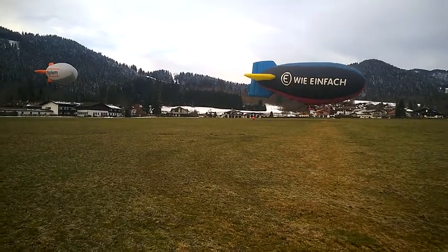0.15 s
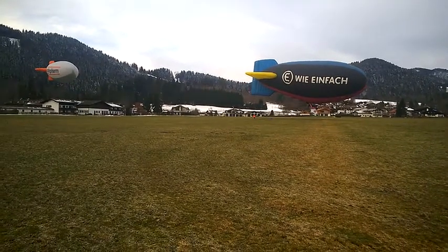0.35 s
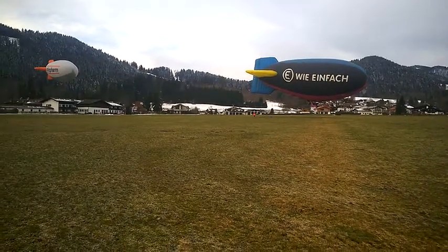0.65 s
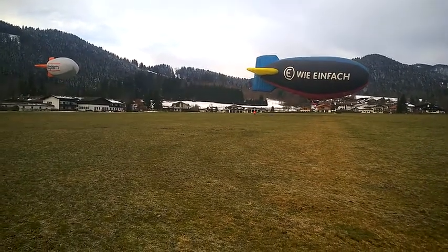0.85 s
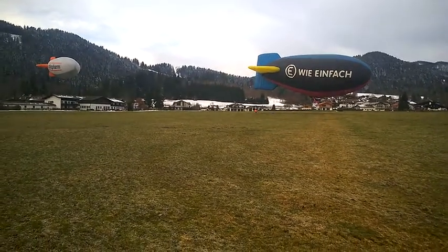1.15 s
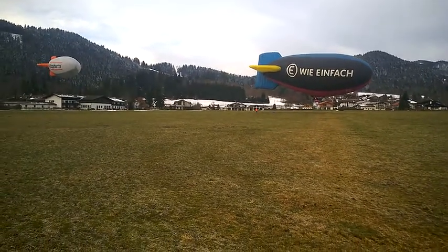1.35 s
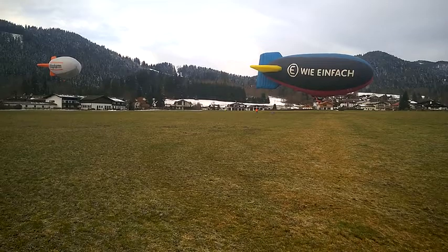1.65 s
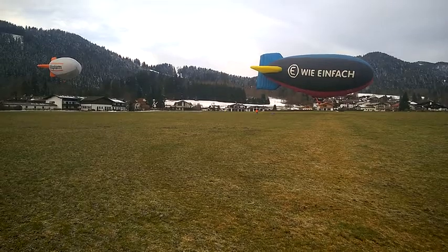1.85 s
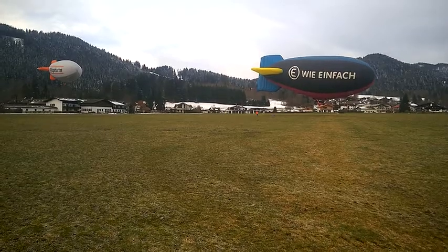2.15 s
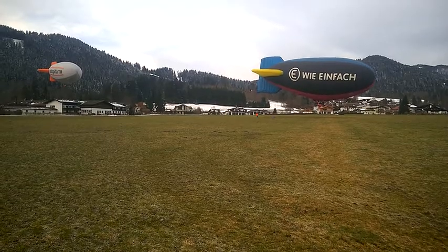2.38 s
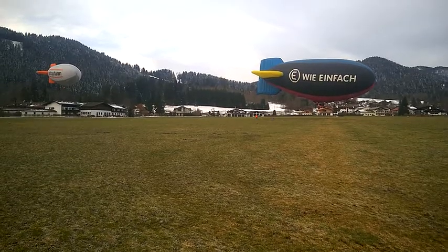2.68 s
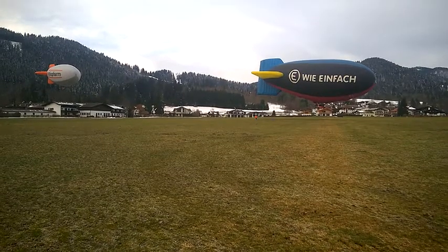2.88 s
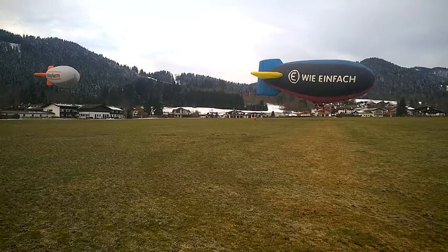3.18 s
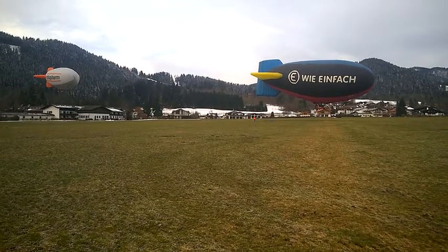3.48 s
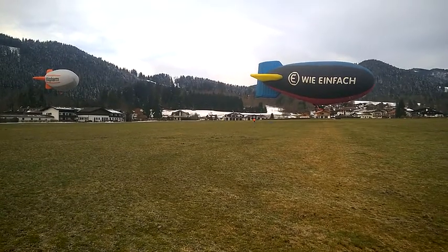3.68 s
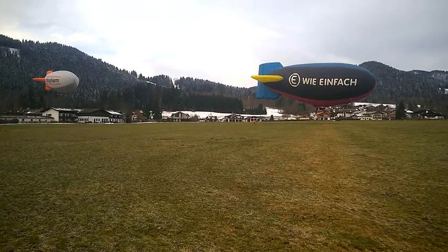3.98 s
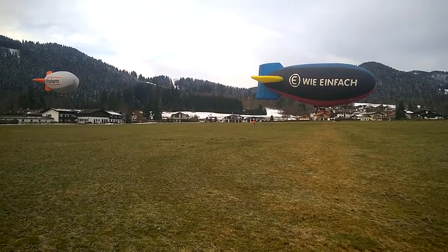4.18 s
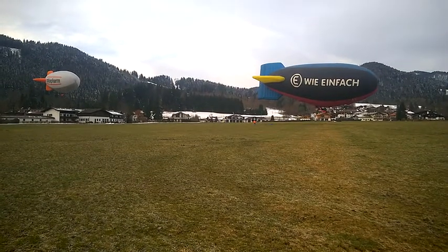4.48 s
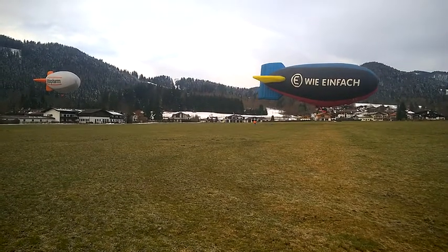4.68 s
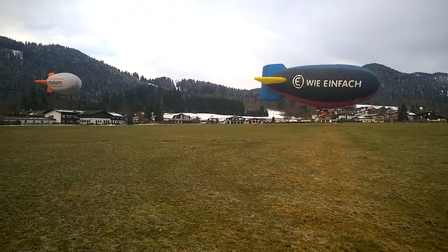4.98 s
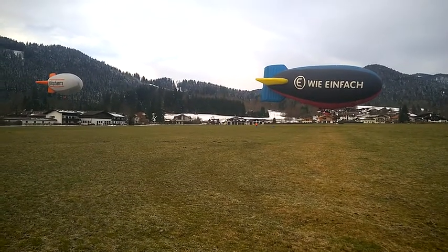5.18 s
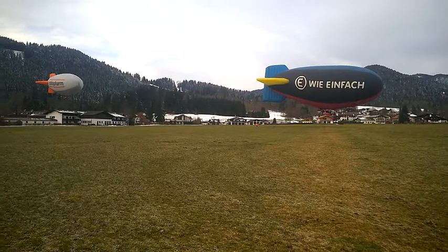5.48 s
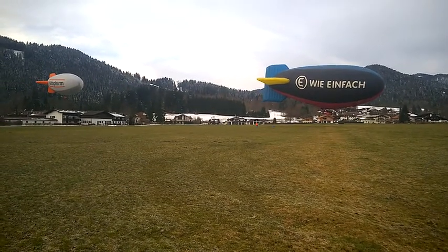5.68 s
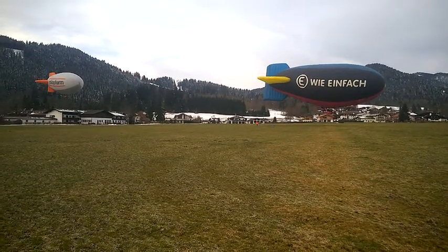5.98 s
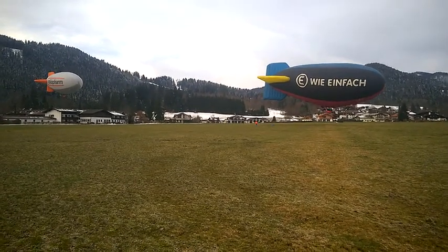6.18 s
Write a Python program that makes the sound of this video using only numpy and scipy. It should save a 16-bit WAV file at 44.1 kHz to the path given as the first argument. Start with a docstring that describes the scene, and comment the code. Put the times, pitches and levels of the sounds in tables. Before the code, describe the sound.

From the start, two small engines drone steadily over an open meadow: a low buzzing hum near 57 to 60 pulses per second, one engine beating slowly against the propeller, with fluttering, breathy blade wash, deep rumble and faint hiss. At about 0.9 s a gas burner lights, giving a deep puff at 1.1 s, sinking briefly, then surging unevenly until it opens into a full, rough, low roar from 1.9 to 3.15 s. It shuts abruptly and dies away by 3.7 s. The throbbing drone returns to the front, with tiny momentary dropouts at 3.85 and 4.85 s. From 5.1 to 6.0 s several blade passes slap harder, with a soft low thud near 5.45 s, and the drone runs on to the end. Distant outdoor phone pickup, stereo, slightly hollow from ground reflection, with little treble.

```python
"""Two hot-air airships hover low over a wide meadow, heard on a phone held near the grass.
Throughout, two engines hum, one throbbing against a slightly slower propeller that pulses and hisses.
At 0.9 s a gas burner (shaped noise) lights with a puff, then roars wide open, shuts and dies by 3.7 s.
From 5.1 s a few blade passes slap harder. The bounce off the turf, set in the noise spectra, leaves
a hollow near 450 Hz; the two microphone ports hear the treble differently."""
import sys
import numpy as np
from scipy import signal
from scipy.fft import rfft, irfft
from scipy.io import wavfile
from scipy.ndimage import uniform_filter1d

SR = 44100
rng = np.random.default_rng(int(sys.argv[2]) if len(sys.argv) > 2 else 0)


def master_out(mix):
    """Clip the mix to full scale and print it as 16-bit PCM to the path in sys.argv[1]."""
    frames = np.transpose(np.atleast_2d(mix))
    ceiling = np.clip(frames, -1, 1)
    pcm = np.round(ceiling * 32767).astype(np.int16)
    wavfile.write(sys.argv[1], SR, pcm)


N = 279584
T = np.arange(N) / SR
HZ = np.maximum(np.fft.rfftfreq(N, 1 / SR), 1)

# propeller speed: time_s, blade_rate_hz
PROP_SPEED = [(0, 56.85), (.7, 56.8), (1.1, 57.3), (3.9, 57.3), (4.4, 57.1), (4.85, 57.05), (5.15, 57.35),
              (5.6, 57.62), (6, 57.45), (6.34, 57.3)]


def undb(db):
    """Decibels to gain."""
    return 10 ** (np.asarray(db) / 20)


def curves(table):
    """Every column of a timed table, joined linearly at every sample."""
    time_s, *columns = np.transpose(table)
    return [np.interp(T, time_s, column) for column in columns]


def across(hz, values):
    """Values joined on a log-frequency axis."""
    return np.interp(np.log(HZ), np.log(hz), values)


def colour(x, spectrum):
    """Gives x a spectrum and rms 1."""
    y = irfft(rfft(x) * undb(across(*np.transpose(spectrum))), N)
    return y / np.sqrt(np.mean(y ** 2))


def walk(rate_hz):
    """Random levels held 1 / rate_hz and slewed twice; spread 1."""
    hold = int(SR / rate_hz)
    steps = np.repeat(rng.standard_normal(N // hold + 1), hold)
    slewed = uniform_filter1d(uniform_filter1d(steps, hold), hold)[:N]
    return slewed / np.std(slewed)


def tone(hz):
    """A sine of rms 1 that follows hz, from a random phase."""
    return np.sqrt(2) * np.sin(2 * np.pi * (np.cumsum(hz) / SR + rng.random()))


def dips():
    """Gain of the low drone, dropping for a moment now and then."""
    # brief bell-shaped dips: centre_s, depth_db, length_s
    dip_table = [(0.633, -8, 0.013), (0.87, -3, 0.024), (3.846, -8, 0.031), (4.855, -16.5, 0.015),
                 (5.132, -5, 0.02), (5.721, -3.5, 0.041)]
    return undb(sum(db * np.exp(-((T - s) / length_s) ** 2) for s, db, length_s in dip_table))


def steady_hiss(gust_db):
    """Faint noise of fixed spectrum, its level wavering slightly and half following the gusts."""
    # hiss spectrum: freq_hz, relative_db_per_hz
    hiss_spectrum = [(3000, -24), (4000, -2), (4900, -4), (5400, -7), (5900, -7.5), (7000, -14),
                     (8000, -15), (10000, -13), (11200, -16.5), (12300, -19.5), (13200, -19),
                     (14100, -21.5), (15700, -22)]
    level_db = -69.5
    noise = undb(1.0 * walk(9.5) + .5 * gust_db) * rng.standard_normal(N)
    return undb(level_db) * colour(noise, hiss_spectrum)


def rumble():
    """Deep noise over the open ground, rising and falling, with a low thud near 5.45 s."""
    # rumble level: time_s, level_db
    rumble_level = [(0, -41), (.7, -40), (1.4, -39), (3.3, -37), (3.8, -37), (4.3, -40.5), (4.8, -39),
                    (5.1, -39.5), (5.3, -40), (5.45, -36), (5.6, -40.5), (6.34, -37.5)]
    # rumble spectrum: freq_hz, relative_db_per_hz
    deep_spectrum = [(12, -40), (20, 5.5), (102, 1.5), (141, -2.5), (183, 1), (206, -4), (244, -11),
                     (297, -10.5), (450, -27.5), (580, -60), (990, -120)]
    rumble_db, = curves(rumble_level)
    return undb(rumble_db + 1.0 * walk(5.99)) * colour(rng.standard_normal(N), deep_spectrum)


def beating_engine():
    """Firing orders that share one crank angle, so each firing is a thump; moving air wavers each order."""
    # engine that beats against the propeller: time_s, firing_rate_hz
    engine_speed = [(0, 59.5), (.85, 59.5), (1.35, 59.85), (1.9, 59.45), (3.8, 59.5), (4.2, 59.65),
                    (4.8, 59.45), (5.2, 59.3), (6.34, 59.33)]
    # firing orders: time_s, first_db, second_db, third_db
    engine_level = [(0, -46, -45, -42), (1, -47, -42, -41.5), (1.5, -45, -40, -40), (2, -40, -38, -39),
                    (3, -45, -39.5, -40.5), (3.8, -42, -42.5, -39.5), (4.4, -43.5, -41.5, -40),
                    (5, -48, -43, -41.5), (5.6, -47, -43.5, -40.5), (6.1, -41, -43, -41.5),
                    (6.34, -44, -43, -42)]
    start_turns, first_order_lead_turns, waver_db = -.06, .08, 1.9
    rate_hz, = curves(engine_speed)
    crank_rad = 2 * np.pi * (np.cumsum(rate_hz) / SR + start_turns)
    firing = np.zeros(N)
    for order, order_db in enumerate(curves(engine_level), 1):
        lead_rad = 2 * np.pi * first_order_lead_turns if order == 1 else 0
        gain = undb(order_db + waver_db * walk(12))
        firing -= gain * np.sqrt(2) * np.sin(order * crank_rad + lead_rad)
    return firing


def propeller_engine():
    """Hum lines of the engine that drives the propeller: they follow its speed, wandering a little."""
    # hum lines: mean_hz, rms_db
    hum_lines = [(99.5, -47.5), (199, -46), (298, -62), (400, -69)]
    blade_hz, = curves(PROP_SPEED)
    drift = blade_hz / np.mean(blade_hz) * (1 + 0.00072 * walk(2.54))
    return sum(undb(db + 1.5 * walk(6.6)) * tone(hz * drift) for hz, db in hum_lines)


def field(gust_db):
    """Engines and rumble, dipping together, under the faint hiss."""
    hiss = steady_hiss(gust_db)
    return dips() * (beating_engine() + propeller_engine() + rumble()) + hiss


def wash(turns, gust_db):
    """Air off the blades: swells once a pass; each band flutters on its own, the treble rides the gusts."""
    # wash spectrum: freq_hz, relative_db_per_hz
    wash_spectrum = [(300, -14.5), (450, -18), (580, -10), (700, -4.5), (950, -2.5), (1060, -7.5),
                     (1140, -4.5), (1210, -2.5), (1280, -8.5), (1340, -9), (1500, -8), (2050, -14.5),
                     (2250, -17), (2600, -22.5), (3200, -23.5), (4000, -38), (6000, -65.5)]
    # bands, each from the top of the one below: top_hz, flutter_db
    band_table = [(560, 2), (800, 0.97), (1000, 1.5), (1170, 1.5), (1250, 2.5), (1600, 2), (2300, 1.84),
                  (3600, 2.5), (8000, 4.5)]
    # breathy band, coming in uneven bursts: time_s, gain_db
    whirr_level = [(0, -3.5), (.7, 0), (1.5, -1), (2.2, -1.5), (3.4, 0), (4.2, 0), (4.9, 2.5), (5.6, -1),
                   (6.34, -2.5)]
    gusty_above_hz, whirr_hz = 1200, 1210
    swell = 1 + 0.18 * np.cos(2 * np.pi * turns)
    air = rfft(colour(swell * rng.standard_normal(N), wash_spectrum))
    whirr_db, = curves(whirr_level)
    total, low_hz = np.zeros(N), 0
    for top_hz, flutter_db in band_table:
        gain_db = flutter_db * walk(22.016)
        if low_hz > gusty_above_hz:
            gain_db = gain_db + gust_db
        if low_hz < whirr_hz <= top_hz:
            gain_db = gain_db + whirr_db
        total += undb(gain_db) * irfft(air * (HZ > low_hz) * (HZ <= top_hz), N)
        low_hz = top_hz
    return total


def blade_pulses(turns, slap):
    """One N-shaped push and pull a blade pass, uneven in size and timing; the slaps are the hardest."""
    # pulse spectrum: freq_hz, relative_db_per_hz
    blade_spectrum = [(150, -26), (290, 0.5), (400, -16), (515, -23), (600, -8.5), (750, -1.5), (920, -1.5),
                      (1100, -3.5), (1500, -11.5), (2000, -12), (3500, -44), (6000, -89)]
    slap_samples, slap_db = slap
    size_spread_db, jitter_s = 1.95, .00008
    passes = np.flatnonzero(np.diff(np.floor(turns)))
    jitter, unevenness = rng.standard_normal((len(passes), 2)).T
    size = undb(size_spread_db * unevenness)
    nearest = abs(passes[:, None] - slap_samples).argmin(axis=0)
    size[nearest] = undb(slap_db)
    pulses = np.zeros(N)
    pulses[np.clip(passes + (jitter_s * SR * jitter).astype(int), 0, N - 1)] = size
    # the quarter-turn phase shift makes each pulse N-shaped
    return signal.hilbert(colour(pulses, blade_spectrum)).imag


def blade_overtones(turns, tones_db):
    """Sines at high multiples of the blade rate, each wavering in level."""
    # overtones: blade_rate_order, rms_db before the shared tones_db
    overtones = [(10, -68), (11, -61), (12, -64), (15, -63), (16, -56.5)]
    waver_db = 1.5
    return sum(undb(db + tones_db + waver_db * walk(5.5)) * np.sqrt(2) * np.sin(2 * np.pi * order * turns)
               for order, db in overtones)


def thrust_thump(turns):
    """Low thump of thrust at the blade rate and its double, dipping with the drone."""
    # thump: time_s, first_harmonic_rms_db
    thump_level = [(0, -44.5), (.4, -44.5), (.8, -48), (1.7, -40.5), (2.4, -48), (3, -48), (3.4, -41),
                   (4.2, -42), (4.8, -47), (5.4, -52), (6.34, -47)]
    lead_turns, second_db, waver_db = .14, -6, 1.2  # the first harmonic runs ahead of the pulse
    thump_db, = curves(thump_level)
    first = np.cos(2 * np.pi * (turns + lead_turns))
    second = undb(second_db) * np.cos(2 * 2 * np.pi * turns)
    return undb(thump_db + waver_db * walk(8)) * np.sqrt(2) * (first + second) * dips()


def propeller(gust_db):
    """Pulses, overtones, thump and wash locked to one blade angle."""
    # levels: time_s, wash_db, pulses_db, overtones_offset_db
    prop_level = [(0, -41.5, -49.5, -2.5), (.8, -41.5, -48, -4), (1.6, -41, -50, -1.5),
                  (2.5, -40.5, -50.5, -1.5), (3.3, -41.5, -47.5, 0), (4.1, -41, -47.5, -3.5),
                  (4.9, -42.5, -46.5, 2.5), (5.5, -43, -45, -2), (6.34, -40, -45.5, -0.5)]
    # hardest slaps: time_s, over_usual_pass_db
    slap_table = [(5.1075, 8), (5.1606, 5), (5.2818, 6), (5.4203, 6), (5.664, 6), (6.0113, 6)]
    rate_hz, = curves(PROP_SPEED)
    wash_db, blade_db, tones_db = curves(prop_level)
    turns = np.cumsum(rate_hz) / SR
    slap_s, slap_db = np.transpose(slap_table)
    slap_samples = (slap_s * SR).astype(int)
    # bend the blade angle so that each slap falls on a pass
    to_pass = np.round(turns[slap_samples]) - turns[slap_samples]
    turns = turns + np.interp(T, slap_s, to_pass)
    blades = undb(blade_db) * blade_pulses(turns, (slap_samples, slap_db))
    tones = blade_overtones(turns, tones_db)
    return blades + tones + thrust_thump(turns) + undb(wash_db) * wash(turns, gust_db)


def burner():
    """Turbulent flame: deep noise that flutters and surges, under an upper roar of varying share."""
    # lit with a puff, low, opened full, shut, dying away: time_s, level_db, upper_over_deep_db
    flame = [(.85, -56.5, 11), (1.09, -27, -7.5), (1.16, -35, -6.5), (1.25, -36, -5), (1.33, -31.5, -6),
             (1.5, -33.5, -3), (1.67, -28.5, -7), (1.79, -39.5, 5.5), (1.9, -28, -3), (2.2, -29, -1),
             (2.45, -28.5, 0), (2.7, -29, 0.5), (2.95, -30.5, 0.5), (3.15, -29.5, -2.5), (3.22, -37, 6),
             (3.4, -39.5, -1), (3.7, -62.5, 8.5)]
    # roar spectrum: freq_hz, relative_db_per_hz
    roar_spectrum = [(12, -44), (20, -19.5), (48, -2.5), (112, -1.5), (233, -5.5), (303, -10.5), (434, -32),
                     (592, -29), (622, -23.5), (733, -17), (1000, -23), (1300, -40.5), (2200, -120)]
    split_hz, flutter_db, surge_db = 220, 0.15, .4
    flame_db, upper_db = curves(flame)
    roar = colour(rng.standard_normal(N), roar_spectrum)
    deep = irfft(rfft(roar) / (1 + (HZ / split_hz) ** 6), N)
    upper = roar - deep
    gain = undb(flame_db + flutter_db * walk(30.34) + surge_db * walk(5.1))
    return gain * (deep + undb(upper_db) * upper)


def scene():
    """Each port hears the sound shifted and shaded, partly as a diffuse blur of its own; top hiss differs."""
    # microphone ports: freq_hz, left_minus_right_db, left_lead_rad, likeness_0_to_1
    ports = [(30, 0, .02, .97), (70, -.2, .06, .987), (200, -.3, .15, .992), (330, -.6, .2, .98),
             (480, 0, .55, .8), (700, 1.5, .8, .93), (850, 2, .85, .8), (1000, 3, .75, .85),
             (1130, 3.5, 1.1, .6), (1220, 2, .4, .73), (1340, 5, 0, .4), (1500, 2.5, -1.1, .78),
             (1750, 3, -.8, .45), (1930, 4, .5, .25), (2200, 5, 2, .66), (2500, 2, 2.9, .35),
             (2800, -1, 4, .72), (3500, .5, 4.2, .74), (4100, 2, 4, .57), (4900, 6.5, 3.6, .62),
             (5500, 5, 3, .42), (5900, 4, 2.6, .53), (7000, 3, 2, .2), (8500, 7, 0, .05), (10000, 8, 0, 0),
             (11200, 0, 0, 0), (12300, -5, 0, 0), (13200, -2, 0, 0), (14100, -7, 0, 0), (15500, -4, 0, 0)]
    fade_s, blur_s = .004, .6
    gust_db = 0.72 * walk(3.83)
    fade = np.clip(np.minimum(T, T[::-1]) / fade_s, 0, 1)
    sound = rfft((field(gust_db) + propeller(gust_db) + burner()) * fade)
    hz, balance_db, lead_rad, likeness = np.transpose(ports)
    likeness = np.clip(across(hz, likeness), 0, 1)
    out = []
    for side in (1, -1):  # left, right
        decay = rfft(rng.standard_normal(N) * np.exp(-T / blur_s))
        blur = decay / abs(decay)  # phase only
        direct = np.exp(.5j * side * across(hz, lead_rad))
        port = np.sqrt(likeness) * direct + np.sqrt(1 - likeness) * blur
        shade = undb(side * across(hz, balance_db) / 2)
        out.append(irfft(sound * port * shade, N))
    return np.array(out)


def record(dry):
    """The phone cuts the top: a steep elliptic low-pass at 15720 Hz."""
    return signal.sosfilt(signal.ellip(14, .3, 60, 15720, fs=SR, output="sos"), dry)


dry = scene()
out = record(dry)
master_out(out)
```